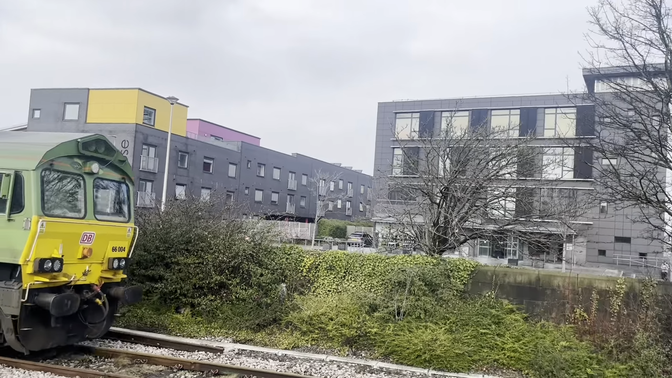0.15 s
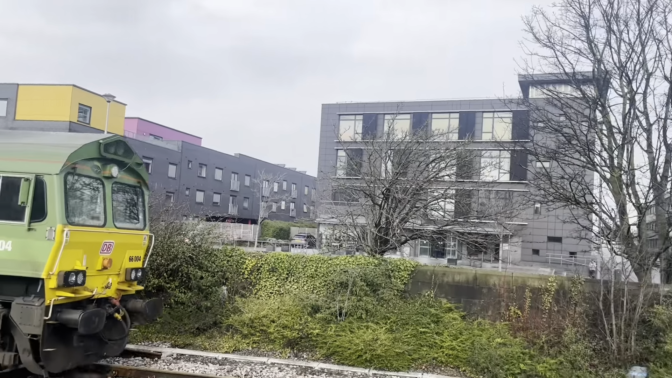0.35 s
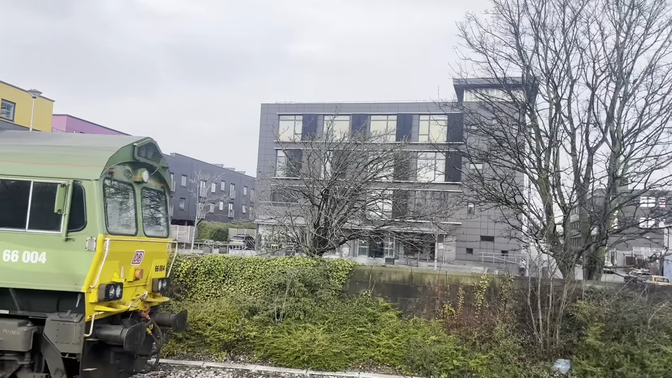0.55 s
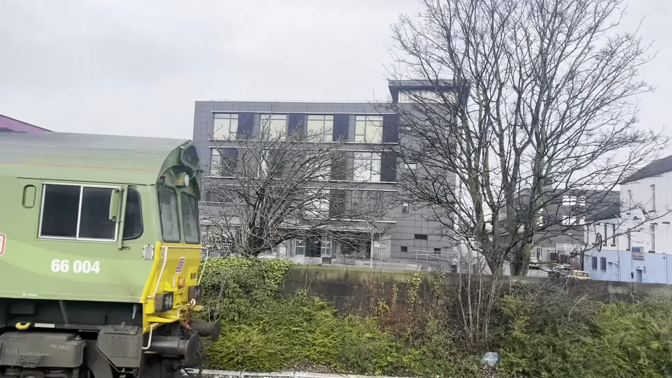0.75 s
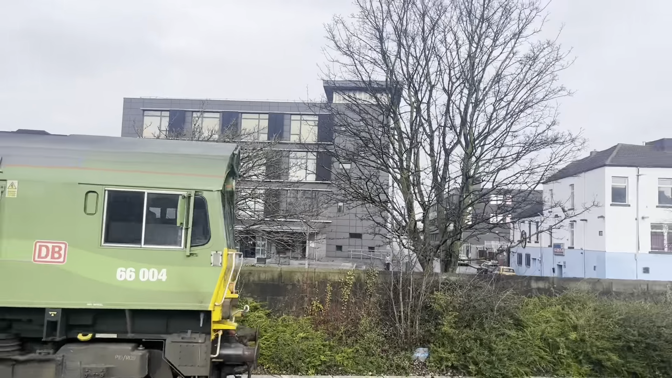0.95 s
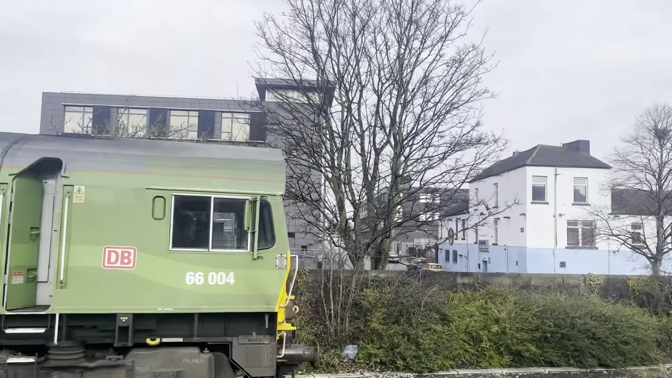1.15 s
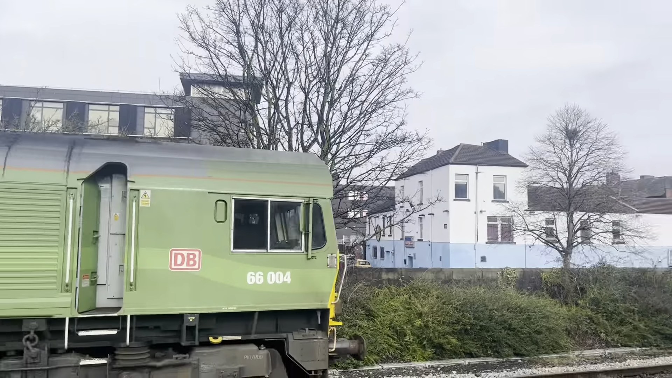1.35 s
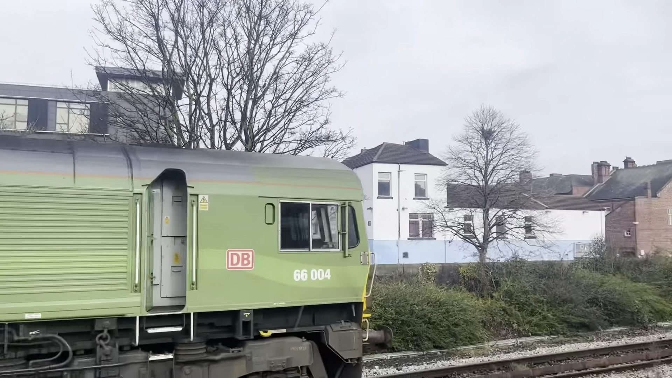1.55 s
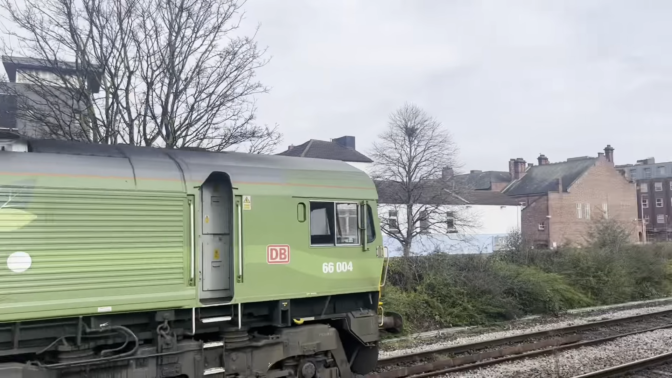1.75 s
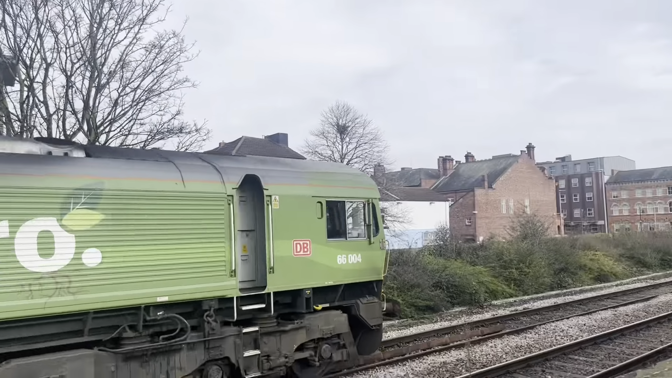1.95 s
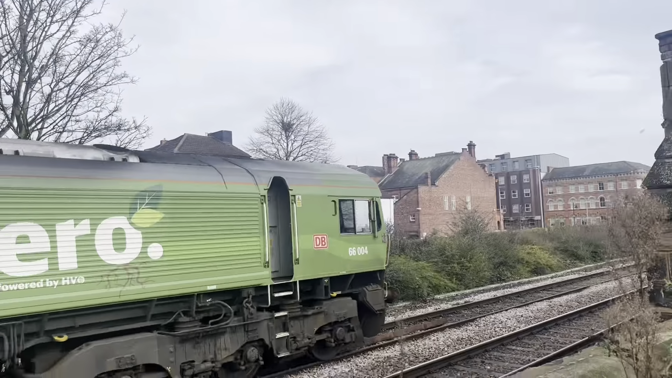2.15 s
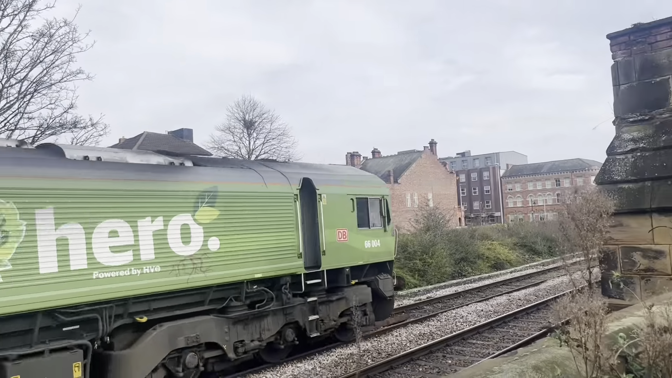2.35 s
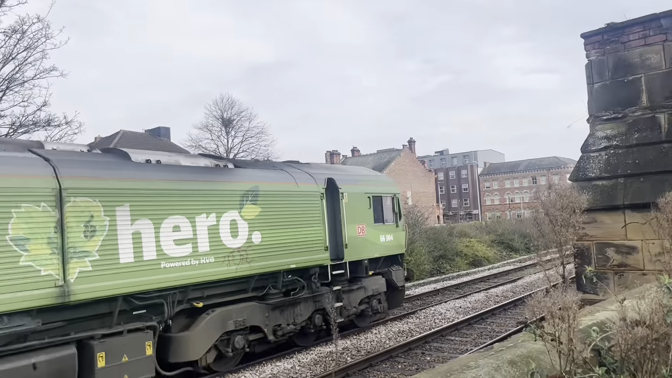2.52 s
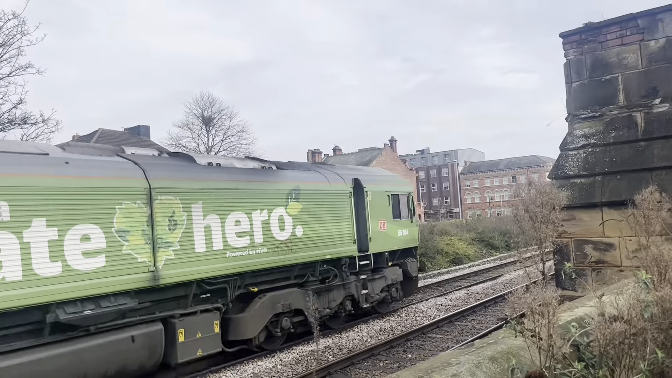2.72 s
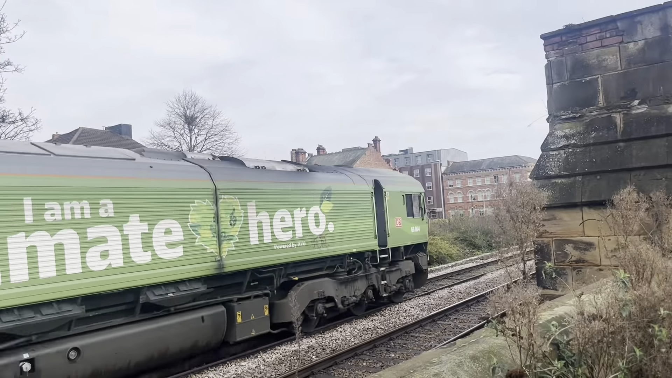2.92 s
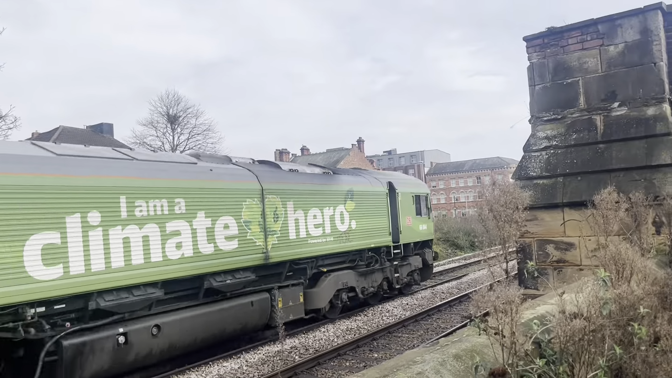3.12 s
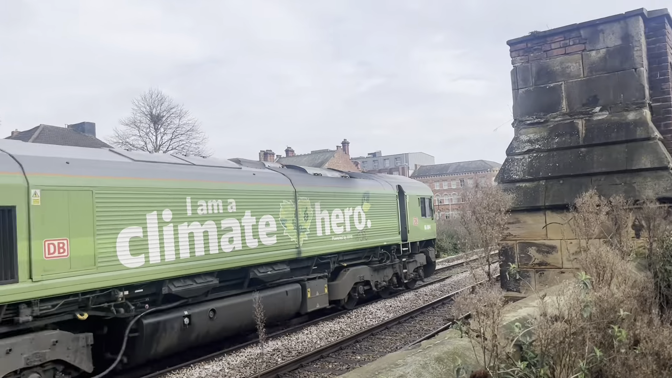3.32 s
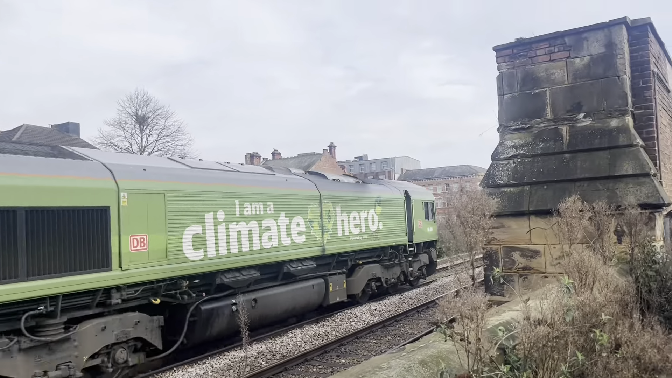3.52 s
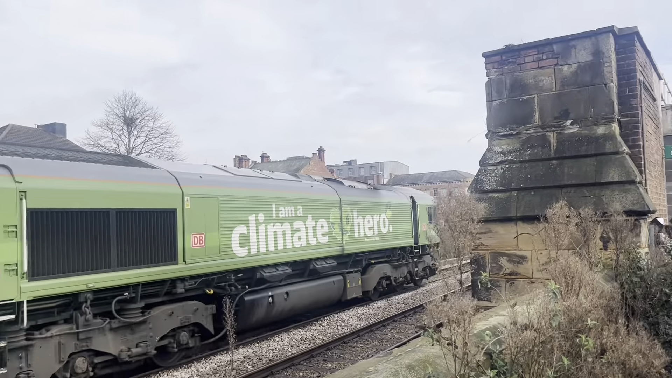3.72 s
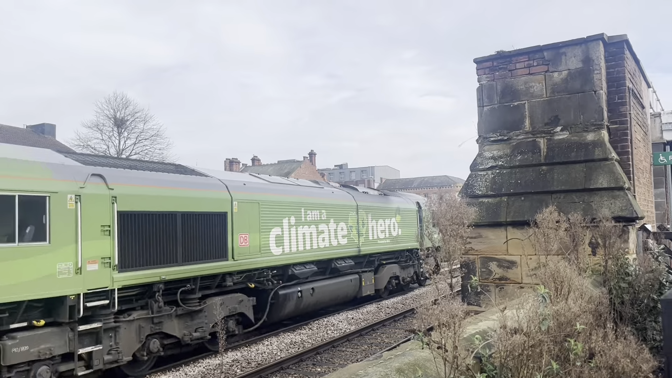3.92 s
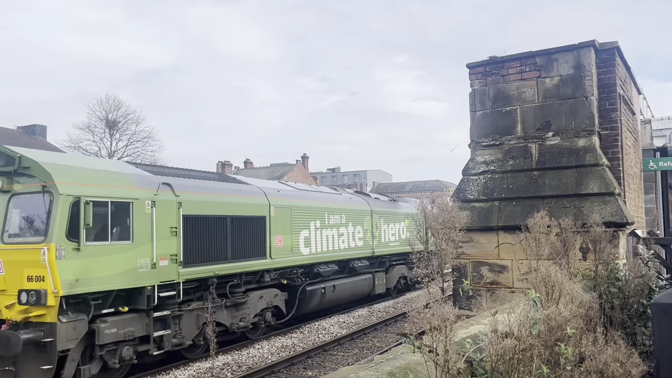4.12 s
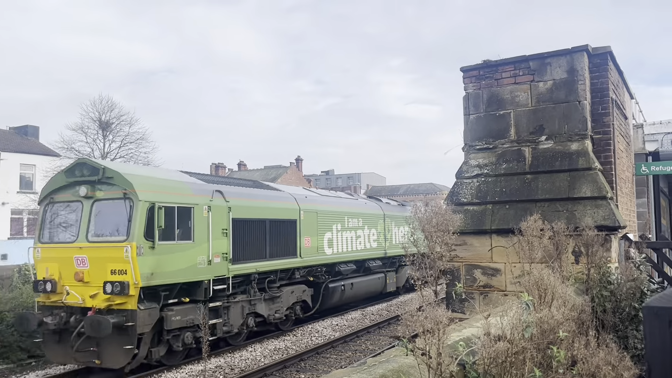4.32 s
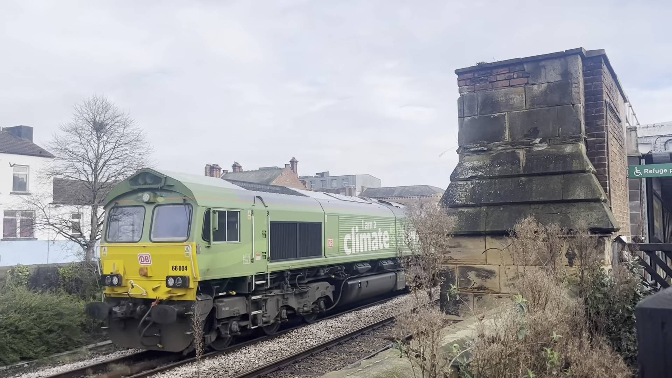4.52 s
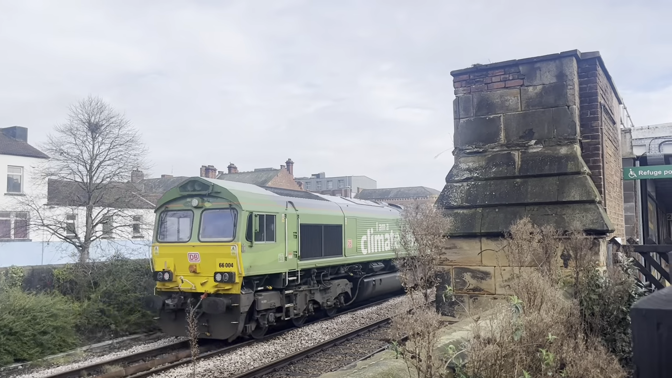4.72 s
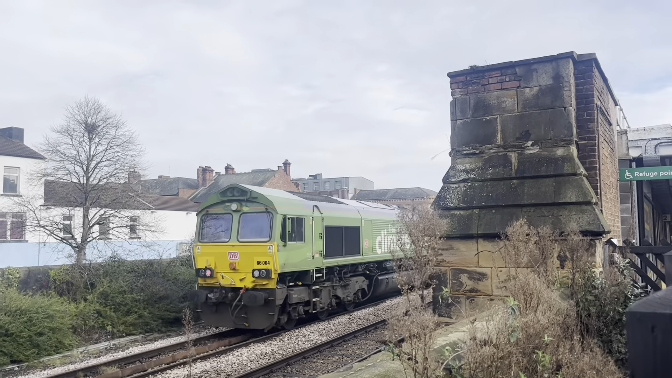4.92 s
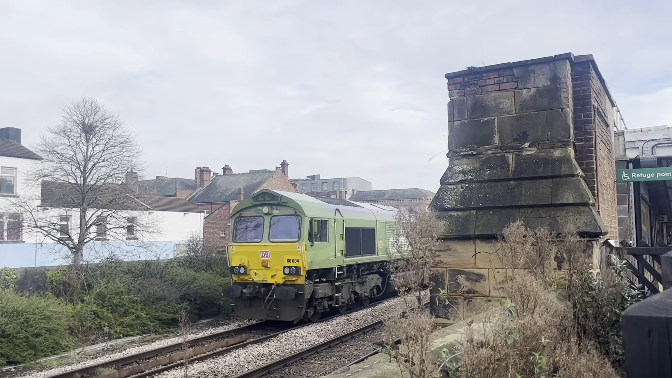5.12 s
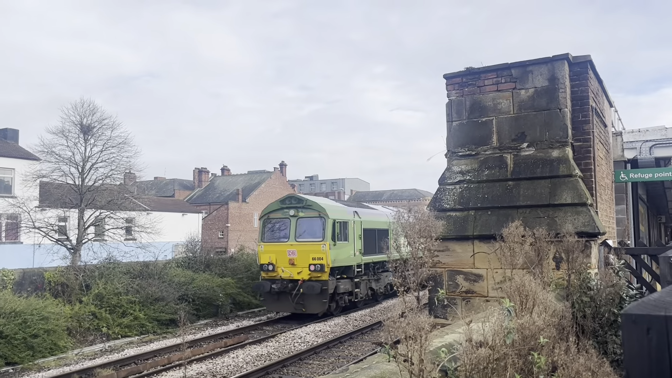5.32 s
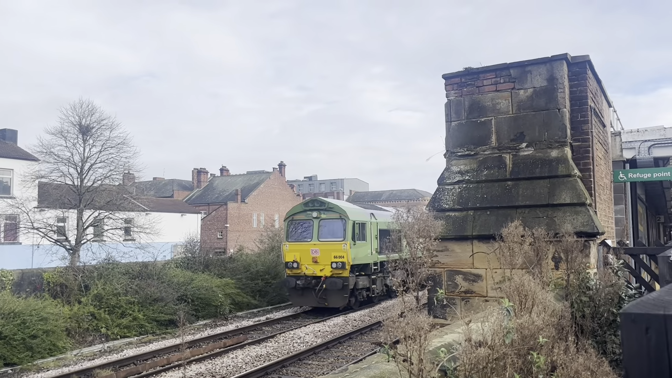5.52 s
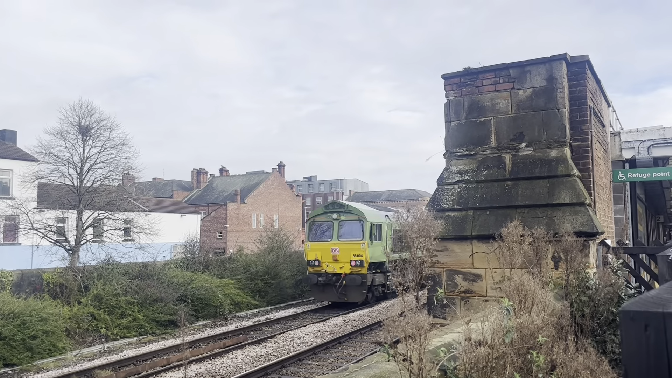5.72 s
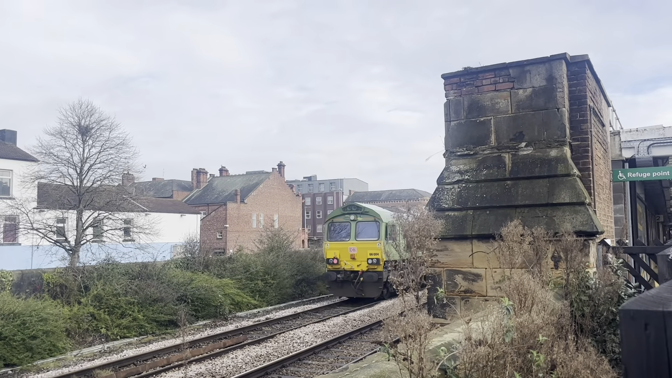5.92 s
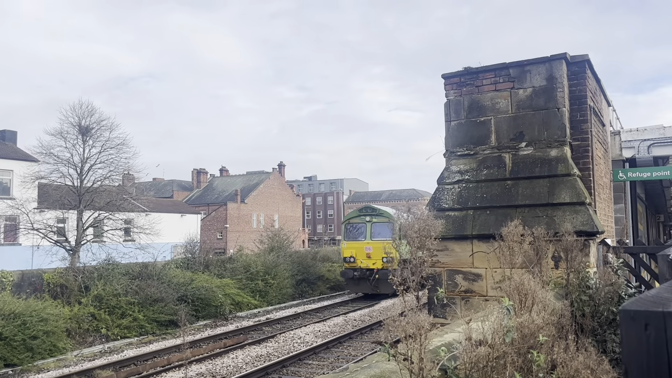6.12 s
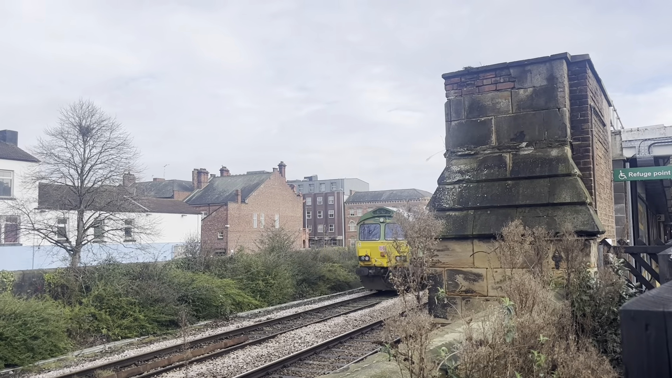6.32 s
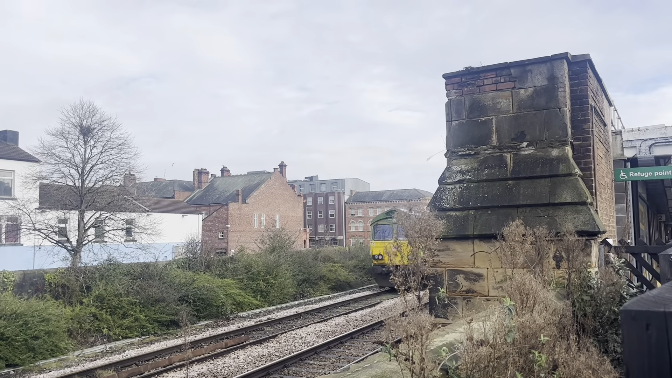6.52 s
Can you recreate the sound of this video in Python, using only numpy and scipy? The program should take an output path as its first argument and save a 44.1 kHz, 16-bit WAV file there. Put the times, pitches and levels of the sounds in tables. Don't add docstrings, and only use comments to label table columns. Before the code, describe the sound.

Deep throbbing engine hum with thin wavering whine and gear moan swells past, a brief bright air vent hisses, and everything recedes into quiet.

```python
import sys
import numpy as np
from scipy import signal
from scipy.fft import rfft, irfft, next_fast_len
from scipy.io import wavfile

SR = 44100
rng = np.random.default_rng(int(sys.argv[2]) if len(sys.argv) > 2 else 0)


def wav_out(sig):
    wavfile.write(sys.argv[1], SR, np.round(np.clip(np.atleast_2d(sig).T, -1, 1) * 32767).astype(np.int16))


N = 289545

TURBO_ORDER = 516
BETWEEN_DB = {"exhaust": -58, "gears": -57, "turbo": -48.5, "blower": -50.5, "blades": -78}
# frequency in Hz, lead of the left in radians for the roar, for the air jet.
LEAD = [(0, 0, 0), (450, -.2, -.1), (1000, 1.8, 1.8), (1680, 3.05, 3.05), (1800, .2, 0), (3000, 1.1, .6),
        (3800, .35, 0), (5000, .5, 0), (5500, -1.0, -1.3), (6700, -1.25, -1.2), (7700, -2.9, -2.75),
        (8900, -3.4, -3.45), (11100, -6.1, -6.1), (12900, -6.4, -6.9), (14500, -9.1, -8.5),
        (15300, -9.42, -9.3)]


def from_db(db):
    return np.exp(np.asarray(db) * (np.log(10) / 20))


def rms_one(x):
    return x / np.sqrt(np.mean(x ** 2, axis=-1, keepdims=True) + 1e-20)


def in_time(rows):
    s, *columns = np.transpose(rows)
    return np.array([np.interp(np.arange(N) / SR, s, column) for column in columns])


def at_hz(points, hz):
    points_hz, points_db = np.transpose(points)
    return np.interp(np.log(hz), np.log(points_hz), points_db)


def drift(rate, size=N):
    coarse, settle = 40, 2000
    pole = np.exp(-2 * np.pi * rate * coarse / SR)
    noise = rng.standard_normal(size // coarse + settle + 2)
    slow = signal.lfilter([1], [1, -2 * pole, pole ** 2], noise)[settle:]
    return np.interp(np.arange(size) / coarse, np.arange(len(slow)), rms_one(slow))


def tone(turns, db, wobble, rate, flutter_db, step=1):
    size = len(turns)
    phase = 2 * np.pi * turns + 7 * rng.random() + wobble * drift(rate * step, size)
    level = from_db(db + flutter_db * drift(rate * step, size))
    return np.sqrt(2) * level * np.sin(phase)


def swells(rows, between_db):
    s = np.arange(0, N + 64, 64) / SR
    centre, length, db = np.transpose(rows)[:, :, None]
    lobes = from_db(db) * np.cos(np.pi * np.clip((s - centre) / length, -.5, .5))
    power = np.sum(lobes ** 2, axis=0) + from_db(between_db) ** 2
    return np.interp(np.arange(N) / SR, s, 10 * np.log10(power))


def passing(closest_s, spread_s, shading_db, db=0):
    since = np.arange(N) / SR - closest_s
    spreading_db = 10 * np.log10(1 + (since / spread_s) ** 2)
    return db - spreading_db - shading_db * np.maximum(since, 0) ** 2


def bands(gain_at, patchy_db, size=N):
    out = 0
    edges = 28 * 2 ** np.arange(0, 9.4, 1 / 3)
    white = rng.standard_normal((2, 2, size))
    together = drift(5.0, size)
    for k, (low, high) in enumerate(zip(edges, edges[1:])):
        flicker = from_db(patchy_db * (0.088 * together + drift(5.4, size)))
        band_filter = signal.butter(2, [low, high], "band", fs=SR, output="sos")
        band = signal.sosfilt(band_filter, white[k % 2])
        out = out + gain_at(np.sqrt(low * high)) * flicker * band
    return out * np.sqrt(SR / 2)


def engine(shaft):
    # shaft order, centre in s, length in s, peak in dB.
    exhaust = [(9, 0.085, 1.0, -19), (9, 0.73, 1.5, -18), (9, 2.04, 0.64, -21.5), (9, 2.4, 0.79, -25.5),
               (9, 3.12, 0.97, -22), (9, 3.8, .8, -29), (9, 4.44, 1.3, -25.5), (9, 5.22, 0.55, -30.5),
               (9, 6, 1.4, -29.5), (16, 0.73, .9, -25), (16, 2.03, 1.38, -19), (16, 2.72, .7, -31),
               (16, 3.77, .9, -31.5), (16, 6.3, 0.9, -37), (24, .05, 0.53, -31.5), (24, 1.35, 1.45, -26.5),
               (24, 2.52, 1.26, -26.5), (24, 3.65, 0.54, -39), (24, 4.24, .7, -40), (24, 4.9, 0.73, -44),
               (24, 6.1, .9, -47)]
    # shaft order, level in dB approaching, alongside, leaving.
    weaker_orders = [(7, -28, -54, -49), (10, -36, -45, -36.5), (11, -32, -35, -42), (12, -32, -37, -50),
                     (13, -36, -58, -38), (15, -31, -43, -45), (17, -34, -32, -61), (18, -40, -34, -61),
                     (21, -34.5, -43, -56), (30, -35, -42, -61), (32, -34.5, -33.5, -58.5),
                     (34, -31, -38.5, -51), (38, -48, -37, -49.5), (39, -39, -36, -61),
                     (45, -41.5, -49, -48), (48, -40, -42, -45.5), (56, -50, -37.5, -52),
                     (66.56, -63, -36.5, -47), (78.9, -35.5, -35, -48.5)]
    views_s = [.8, 2.25, 4.8]
    coarse = 8
    shaft = shaft[::coarse]
    s = np.arange(0, N, coarse) / SR
    hum = 0
    for order in (9, 16, 24):
        beats = [row[1:] for row in exhaust if round(row[0]) == order]
        db = swells(beats, BETWEEN_DB["exhaust"])[::coarse]
        hum += tone(order * shaft, db, wobble=0.28, rate=0.97, flutter_db=-1.2, step=coarse)
    fading_db = -2.5 * np.maximum(s - views_s[-1], 0)
    for order, *view_db in weaker_orders:
        db = np.interp(s, views_s, view_db) + fading_db
        hum += tone(np.round(order) * shaft, db, wobble=0.73, rate=4.6, flutter_db=2.0, step=coarse)
    return signal.resample_poly(hum, coarse, 1)[:N]


def whines(shaft):
    # centre in seconds, length in seconds, peak in dB.
    turbo_swells = [(.27, 0.25, -33), (.41, 0.12, -36), (.72, 0.13, -36.5), (1.0, 0.22, -39),
                    (1.2, 0.28, -32.5), (1.44, .2, -32.5), (1.73, .18, -41.5), (2.08, 0.32, -37.5),
                    (2.33, 0.27, -38.5), (2.54, 0.15, -33.5), (2.74, 0.16, -32), (2.87, 0.14, -33.5),
                    (3.1, 0.27, -33), (3.35, 0.52, -38), (3.62, 0.37, -33.5), (3.9, 0.33, -33),
                    (4.02, 0.15, -35), (4.18, 0.23, -37.5), (4.38, .3, -43.5), (4.74, 0.3, -38.5),
                    (4.88, 0.12, -37), (5.05, 0.42, -40.5), (5.26, 0.11, -37.5), (5.42, 0.34, -38),
                    (5.62, 0.24, -38.5), (5.82, 0.21, -42.5), (6.3, 0.25, -51)]
    # centre in seconds, length in seconds, peak in dB.
    blower_swells = [(.22, 0.19, -45), (.44, 0.091, -42), (.7, 0.34, -37), (.95, 0.36, -33.5),
                     (1.14, 0.26, -39), (1.44, 0.28, -32.5), (1.66, 0.25, -37), (1.81, 0.1, -37),
                     (1.95, 0.099, -33.5), (2.33, 0.41, -34.5), (2.55, 0.23, -44), (2.92, 0.13, -35),
                     (3.29, .15, -43), (3.53, 0.32, -40.5), (3.77, 0.25, -37.5), (3.97, 0.29, -35),
                     (4.21, 0.12, -40.5), (4.54, 0.09, -42), (4.66, 0.13, -39.5), (4.82, 0.11, -40.5),
                     (5.05, .45, -48), (5.38, 0.16, -46.5), (5.85, .26, -49), (6.15, 0.14, -47),
                     (6.32, 0.082, -49), (6.47, 0.11, -49)]
    # centre in seconds, length in seconds, peak in dB.
    blade_swells = [
        (.85, .6, -54),
        (1.22, .3, -46.5),
        (1.95, 0.92, -48.5),
        (2.6, .9, -52),
        (3.8, 1.3, -54.5),
        (4.9, 1.8, -62),
        (6.3, .4, -70),
    ]
    # time in seconds, frequency in Hz.
    blade_hz = [(0, 5540), (.8, 5530), (1.25, 5500), (1.9, 5405), (2.6, 5350), (3.7, 5305), (5, 5282),
                (6.57, 5275)]
    # shaft order, closest in seconds, spread in seconds, shading in dB per s squared, level in dB.
    faint_lines = [
        (6, 2.3, 0.35, -1, -33),
        (158.7, 1.6, 0.66, 1.2, -37.5),
        (268, 1.3, 0.19, .2, -34),
        (1030, 4.54, .5, 2, -63),
    ]
    turbo_db = swells(turbo_swells, BETWEEN_DB["turbo"]) - 2.0
    turbo = tone(TURBO_ORDER * shaft, turbo_db, wobble=0.45, rate=41, flutter_db=3.0)
    blower_db = swells(blower_swells, BETWEEN_DB["blower"]) + 4
    blower = tone(234.9 * shaft, blower_db, wobble=0.33, rate=25, flutter_db=3.5)
    blade_turns = np.cumsum(in_time(blade_hz)[0]) / SR
    blade_db = swells(blade_swells, BETWEEN_DB["blades"])
    blades = tone(blade_turns, blade_db, wobble=1.1, rate=44, flutter_db=3.5)
    faint = 0
    for order, *law in faint_lines:
        faint += tone(np.round(order) * shaft, passing(*law), wobble=1.3, rate=14, flutter_db=3.0)
    return turbo + blower + blades + faint


def gears():
    # time in seconds, frequency in Hz.
    mesh_hz = [(0, 214), (.7, 216.5), (1.6, 216), (1.9, 214), (2.5, 213), (3, 209), (5, 208), (6.57, 207)]
    # centre in seconds, length in seconds, peak in dB.
    beats = [(.12, .16, -27), (.38, 0.093, -21.5), (.62, 0.42, -20.5), (.92, .6, -15), (1.15, 0.27, -16.5),
             (1.42, 0.27, -12), (1.65, 0.086, -11), (1.82, 0.14, -12), (1.98, 0.099, -22),
             (2.13, 0.096, -16), (2.27, 0.12, -15), (2.43, 0.25, -18), (2.75, 0.28, -22.5),
             (2.9, 0.19, -23), (3.15, 0.34, -23), (3.38, 0.085, -23.5), (3.56, .22, -28.5),
             (3.78, 0.18, -31), (3.98, 0.21, -35), (4.13, 0.14, -31.5), (4.29, .22, -27.5),
             (4.45, 0.14, -32), (4.8, 0.45, -32.5), (5.07, 0.11, -30.5)]
    turns = np.cumsum(in_time(mesh_hz)[0]) / SR
    moan_db = swells(beats, BETWEEN_DB["gears"]) - 2.74
    second_db = passing(closest_s=1.84, spread_s=1.5, shading_db=5, db=-29.5)
    third_db = passing(closest_s=0.75, spread_s=0.93, shading_db=0.26, db=-31.5)
    moan = tone(turns, moan_db, wobble=0.81, rate=7.3, flutter_db=0.5)
    moan += tone(2 * turns, second_db, wobble=1.22, rate=11.2, flutter_db=3.5)
    return moan + tone(3 * turns, third_db, wobble=2.13, rate=11.2, flutter_db=3.0)


def vent():
    # frequency in Hz, level in dB.
    jet = [(1500, -40), (2300, -6), (3200, -3.5), (4200, -2), (5300, -4.5), (6500, -3.5), (8200, 2.5),
           (10000, -2), (13000, -5.5), (15500, 1)]
    vent_s, open_s, hold_s = 2.966, 0.16, 0.29
    vent_db, build_db, shut_db_per_s = -64.5, 1, 220
    out = np.zeros((2, N))
    span = slice(int(2.8 * SR), int(3.8 * SR))
    since = np.arange(N)[span] / SR - vent_s
    held = np.clip((since - open_s) / hold_s, 0, 1)
    shut_s = np.maximum(since - open_s - hold_s, 0)
    db = vent_db + build_db * np.sin(np.pi * held) - shut_db_per_s * shut_s
    level = np.clip(since / open_s, 0, 1) * from_db(db)
    out[:, span] = level * bands(lambda hz: from_db(at_hz(jet, hz)), patchy_db=.5, size=len(level))
    return out * [[1.15], [.25]]


def tick():
    # start in seconds, peak in dB.
    finger_ticks = [
        (0.0525, -9.5),
    ]
    out = np.zeros((2, N))
    s = np.arange(int(.03 * SR)) / SR
    snap_s, knock_s = .0011, .006
    swell = np.exp(-((s - snap_s) / np.where(s < snap_s, .0006, .0003)) ** 2)
    partials = ((1250, 0.95), (3900, 0.97), (5300, 0.97))  # Hz, share
    rattle = swell * sum(share * np.cos(2 * np.pi * hz * (s - snap_s)) for hz, share in partials)
    knock = -np.exp(-((s - knock_s) / 0.0015) ** 2) * np.cos(2 * np.pi * 170 * (s - knock_s))
    for start, db in finger_ticks:
        at = int(start * SR)
        out[:, at:at + len(s)] += from_db(db) * (rattle * [[1.15], [0]] + 1.3 * knock)
    return out


def roar():
    # closest in seconds, spread in seconds, shading in dB per s squared.
    parts = [
        (1.84, 1.25, 0.22),
        (2.04, 1.34, 0.37),
        (2.02, 1.3, 0.12),
        (1.22, 0.91, 0.5),
    ]
    parts_hz = [300, 650, 2300, 11000]
    # frequency in Hz, density in dB per Hz.
    colour = [(45, -11), (90, -8.5), (160, -11), (300, -13.5), (480, -13.5), (720, -14.5), (900, -24.5),
              (1700, -29), (2600, -30.5), (4500, -37.5), (7000, -42), (10000, -43), (12500, -81),
              (15500, -48)]
    # frequency in Hz, density in dB per Hz.
    town = [(45, -51.5), (150, -77), (500, -80), (1000, -77), (1500, -67), (2000, -104), (5000, -102),
            (12000, -128)]
    levels = np.array([passing(*law) for law in parts])
    alongside = slice(int(.2 * SR), int(2.8 * SR))
    levels -= levels[:, alongside].mean(axis=1, keepdims=True)

    def gain_at(hz):
        place = np.interp(np.log(hz), np.log(parts_hz), np.arange(4))
        below = min(int(place), 2)
        change_db = levels[below] + (place - below) * (levels[below + 1] - levels[below])
        return np.hypot(from_db(at_hz(colour, hz) - 38 + change_db), from_db(at_hz(town, hz)))

    return bands(gain_at, patchy_db=0.66)


def ports(direct, scattered, lead):
    # frequency in Hz, left minus right in dB.
    lean = [(0, 0), (200, -.7), (330, .6), (680, -4.5), (1000, -1.1), (1450, -3.5), (1800, 4.5), (2600, 0),
            (3500, 2.8), (5200, -1.1), (6500, .8), (8000, 0)]
    # frequency in Hz, likeness from 0 to 1.
    likeness = [(0, .996), (450, .96), (1200, .7), (1700, .55), (2300, .8), (3600, .6), (4500, .82),
                (5500, .7), (7400, .82), (7800, .97), (8800, .97), (10000, .82), (11200, .97), (12900, .97),
                (13600, .5), (14700, .96)]
    # centre in Hz, width in Hz, gain in dB.
    colouring = [
        (850, 90, -2.5),
        (1830, 130, -5),
        (3600, 400, 1.5),
        (11900, 600, 2.0),
        (15300, 900, -2.5),
    ]
    size = next_fast_len(N + 4096)
    hz = np.fft.rfftfreq(size, 1 / SR)
    lead = np.interp(hz, np.array(LEAD)[:, 0], lead)
    lean_db = np.interp(hz, *np.transpose(lean))
    alike = np.clip(np.interp(hz, *np.transpose(likeness)), 0, 1)
    shared = np.sqrt((1 + alike) / 2) * rfft(direct, size)
    apart = np.sqrt((1 - alike) / 2) * rfft(scattered, size)
    turn = from_db(lean_db / 2) * np.exp(.5j * lead)
    response_db = sum(db * np.exp(-((hz - centre) / width) ** 2) for centre, width, db in colouring)
    both = np.array([(shared + apart) * turn, (shared - apart) / turn])
    return irfft(from_db(response_db) * both, size)[:, :N]


def scene():
    # time in seconds, frequency in Hz.
    whine_hz = [(0, 3000), (.3, 3018), (.7, 3032), (1.1, 3036), (1.5, 3028), (1.9, 3005), (2.2, 2975),
                (2.6, 2948), (3, 2930), (3.5, 2915), (4, 2908), (5, 2898), (6.57, 2890)]
    shaft = np.cumsum(in_time(whine_hz)[0] / TURBO_ORDER) / SR
    direct, scattered = roar()
    direct = direct + engine(shaft) + whines(shaft) + gears()
    roar_lead, jet_lead = np.transpose(LEAD)[1:]
    return ports(direct, scattered, roar_lead) + ports(*vent(), jet_lead) + tick()


def top_cut(x):
    return signal.sosfilt(signal.butter(12, 15750, fs=SR, output="sos"), x)


def record(dry):
    rumble_filter = signal.butter(8, 31, "high", fs=SR, output="sos")
    return top_cut(signal.sosfilt(rumble_filter, dry))


dry = scene()
out = record(dry)
wav_out(out)
```